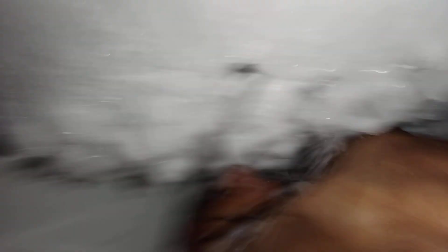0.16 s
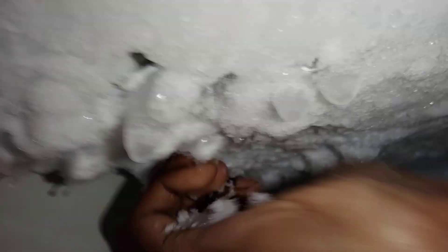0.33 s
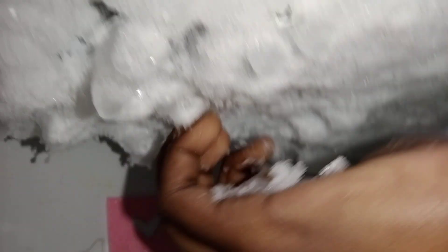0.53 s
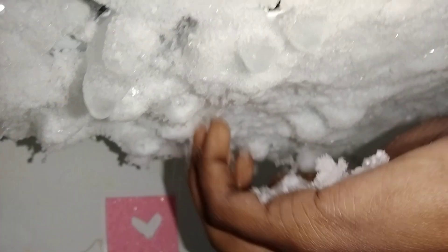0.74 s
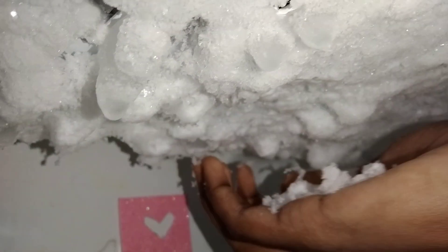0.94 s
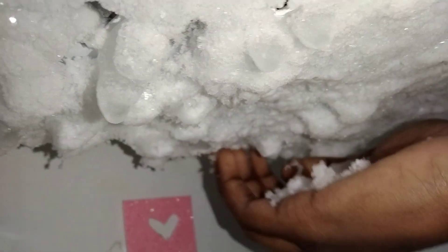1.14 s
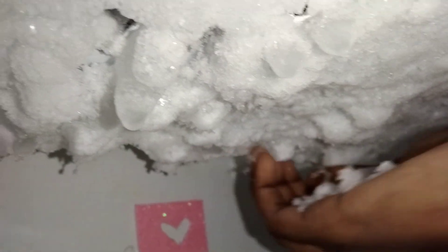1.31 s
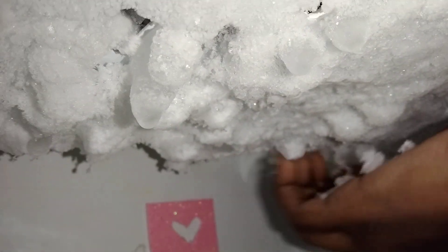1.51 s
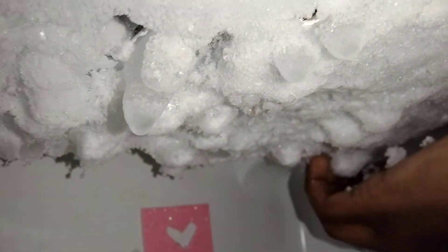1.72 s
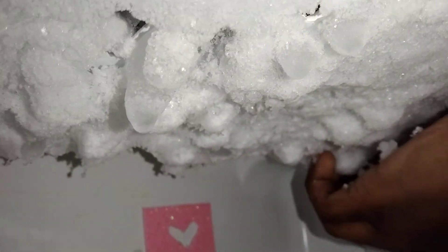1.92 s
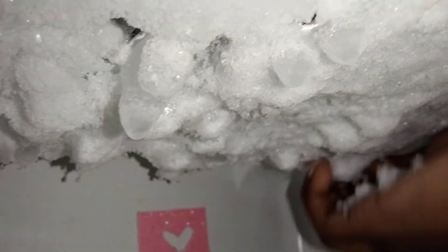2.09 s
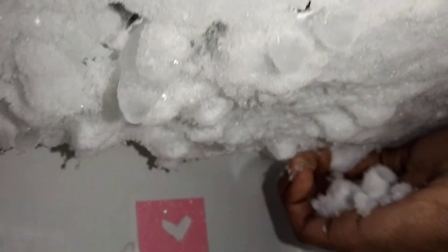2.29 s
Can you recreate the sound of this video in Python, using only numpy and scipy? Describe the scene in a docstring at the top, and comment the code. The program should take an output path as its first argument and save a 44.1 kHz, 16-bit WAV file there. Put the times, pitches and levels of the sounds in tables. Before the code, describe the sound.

Frost cracks under a hand inside a freezer, close up. A small crack and grainy rustle lead to a loud snap at 0.25 seconds, and crumbs rumble against the plastic liner until 0.6. Quieter scraping and dull knocks follow. From 1.6 seconds the crackling thickens, reaching a sharp crack and knock at about 2.1. The compressor hums and whirrs low throughout.

```python
"""A small crack and a grainy rustle, then a loud snap: a hand breaks frost in a freezer, close up. The lump
rings briefly as it snaps off; its crumbs shake the plastic liner, which rumbles and booms. Cracks, dull knocks
and scraping follow the fingers, and a second break rings near the end. Cracks and scraping are runs of tiny
fractures, bright through the air, dull through the liner. The compressor hums and whirrs underneath."""
import sys
import numpy as np
from scipy import signal
from scipy.fft import rfft, irfft, next_fast_len
from scipy.io import wavfile
from scipy.ndimage import uniform_filter1d, map_coordinates

SR = 44100
rng = np.random.default_rng(int(sys.argv[2]) if len(sys.argv) > 2 else 0)


def log_audio(samples):
    """Write samples as a 16-bit WAV file to the path given in sys.argv[1]."""
    # one column per channel
    frames = np.atleast_2d(samples).T
    # limit to full scale, then quantise
    limited = np.clip(frames, -1, 1)
    pcm = np.round(limited * 32767).astype(np.int16)
    wavfile.write(sys.argv[1], SR, pcm)


N = 103635

# compressor shaft harmonics: multiple, level/dB
HUM_HARMONICS = [(1, -64.5), (2, -48), (3, -44.5), (4, -61.5), (5, -64), (6, -62), (9, -65.5)]
# swell of the hum: t/s, gain/dB
HUM_ENVELOPE = [(0, -2.5), (.6, -1.5), (.9, 0.5), (1.7, -2), (1.95, -3), (2.2, 1.5), (2.35, 0.5)]
# compressor whirr: f/Hz, gain/dB
WHIRR_SPECTRUM = [(12, -31), (30, -12), (75, -15.5), (125, -3), (175, -14.5), (215, -3), (334, -20),
                  (500, -10.5), (808, -19), (1050, -29.5), (2050, -45), (3000, -66.5), (4000, -79),
                  (13200, -120)]
# crushed frost: f/Hz, gain/dB
FROST_SPECTRUM = [(710, -53), (1200, -1), (1620, -13), (2240, -2.5), (4330, -17.5), (6180, -13), (7510, -8),
                  (10500, -17.5), (13300, -15.5), (15000, -14), (15800, -5.5)]
# liner and cavity resonances: f/Hz, width/Hz, gain/dB
LINER_MODES = [(302, 136, 4.5), (513, 182, 5.5), (808, 65, 7), (955, 69, 2), (1390, 170, 5),
               (1836, 236, -1), (2346, 300, -9), (2807, 72, -3.5)]
# frost rustle through the air: t/s, level/dB
RUSTLE_ENVELOPE = [(0, -55), (.1, -58.5), (.2, -62.5), (.24, -56), (.3, -47.5), (.39, -48), (.45, -55.5),
                   (.55, -57.5), (.65, -66.5), (.79, -74), (.84, -58), (.95, -72), (1.02, -85),
                   (1.18, -83.5), (1.21, -62.5), (1.35, -62.5), (1.42, -54.5), (1.46, -62), (1.6, -68.5),
                   (1.63, -53.5), (1.73, -54.5), (1.81, -52), (1.93, -51.5), (2.02, -57.5), (2.12, -43.5),
                   (2.19, -57), (2.27, -55.5), (2.35, -56)]
# scrape through the liner: t/s, level/dB
SCRAPE_ENVELOPE = [(0, -55), (.2, -57), (.27, -48), (.4, -43.5), (.5, -54), (.6, -60.5), (.7, -56.5),
                   (.78, -61.5), (.84, -55.5), (.95, -57), (1.05, -59.5), (1.17, -61.5), (1.23, -45),
                   (1.27, -57.5), (1.4, -46), (1.435, -44.5), (1.45, -55), (1.6, -51.5), (1.76, -49.5),
                   (1.92, -49), (2, -61), (2.11, -45.5), (2.16, -43.5), (2.185, -56), (2.35, -51.5)]
# panel resonances: f/Hz, width/Hz, gain/dB
PANEL_MODES = [(119, 20, 3), (200.7, 17, 7.5), (292, 40, -4), (351, 44, -4), (562, 60, -9.5),
               (980, 280, -14.5)]
# panel shaken by crumbs: t/s, level/dB
RUMBLE_ENVELOPE = [(0.25, -22), (0.27, -25.5), (0.296, -30), (0.316, -29.5), (0.404, -32.5), (0.614, -49),
                   (0.664, -62), (0.682, -86), (0.706, -53), (0.8, -83)]
# lowest panel mode: t/s, level/dB
BOOM_ENVELOPE = [(.24, -72), (.26, -35), (.3, -53), (.36, -35), (.4, -33.5), (.43, -38), (.46, -56),
                 (.55, -58), (.6, -76)]
# finger and crumb knocks, and at 2.0965 s the ringing body of a second break: t/s, level/dB, f/Hz, t60/ms
KNOCK_EVENTS = [(0.264, -25, 204, 40), (0.308, -33.5, 760, 60), (0.421, -48, 910, 61),
                (0.668, -41, 670, 40), (0.709, -47.5, 805, 42), (0.834, -45, 586, 140),
                (0.948, -41.5, 537, 63), (0.959, -41.5, 580, 24), (1.097, -41, 640, 38),
                (1.109, -41, 750, 63), (1.194, -41.5, 960, 50), (1.204, -38, 246, 110),
                (1.21, -39, 594, 114), (1.219, -37.5, 462, 120), (1.231, -41.5, 1506, 76),
                (1.296, -53, 464, 96), (1.335, -50.5, 1534, 120), (1.383, -42, 802, 89),
                (1.505, -50, 1530, 54), (1.58, -39, 1516, 46), (1.583, -44.5, 814, 150),
                (1.699, -44, 1497, 52), (1.796, -40, 1438, 110), (1.858, -46.5, 1815, 60),
                (1.882, -45, 1780, 44), (2.0505, -35.5, 1414, 48), (2.0965, -30, 198, 72),
                (2.0965, -27.5, 805, 35), (2.0965, -31.5, 458, 35), (2.0995, -40, 719, 68)]
# small cracks: t/s, air level/dB, top-treble gain/dB, liner level/dB, length/ms
CRACK_EVENTS = [(0.02, -35, -1.5, -52, 7), (0.092, -47.5, -3, -43, 4), (0.1111, -57.5, 17, -66, 5.3),
                (0.2233, -42.5, 13, -47, 7.3), (0.234, -46, 18, -72, 4.4), (0.274, -32.5, -1, -31, 12),
                (0.281, -38, -2, -42, 5.7), (0.306, -41.5, -4, -32.5, 18), (0.353, -41.5, 8, -32, 7.5),
                (0.365, -34, -18, -35.5, 9.8), (0.4005, -46.5, 1, -47, 16), (0.416, -41.5, -4, -38, 18.5),
                (0.459, -39.5, 2, -43.5, 9.9), (0.48, -41.5, 0, -44.5, 13), (0.524, -42.5, 0, -75, 6.3),
                (0.8108, -61.5, -6, -53, 12), (0.825, -51, -6, -47.5, 22), (0.861, -57, -14, -73, 8.9),
                (0.8798, -59.5, -7, -49.5, 14), (1.0456, -62.5, 4.5, -53, 24.4),
                (1.2335, -55.5, 5, -40.5, 9.4), (1.2822, -68, 10, -49.5, 28), (1.4067, -59, 7, -46.5, 20),
                (1.5097, -59, 3, -44.5, 14.4), (1.6278, -45, 6, -51, 12), (1.6686, -51, -4, -61, 6.3),
                (1.7858, -51, -7, -48.5, 7), (1.8, -47.5, -10, -41.5, 7), (1.822, -48, -2, -47, 7.5),
                (1.844, -37.5, -10, -47, 4), (1.861, -45, -3, -58, 6.1), (1.8808, -44.5, 2, -57, 10),
                (1.911, -55.5, 14, -49, 9.4), (1.9802, -39.5, -6, -49.5, 10.3),
                (2.0249, -52, -7, -43.5, 5.9), (2.05, -37.5, -1, -41, 12.3), (2.069, -46, -4, -42, 11),
                (2.0856, -44, -6, -32, 7), (2.0957, -27, -1.5, -29, 6.2), (2.11, -44, -6, -39, 10),
                (2.123, -39.5, -5, -35, 11), (2.136, -54, -10, -46, 6.2), (2.147, -42, -10, -55, 4.4),
                (2.161, -46, -12, -41, 4.4), (2.217, -50, 0, -41, 9.1), (2.292, -39, 5, -40.5, 7.5),
                (2.311, -45, 6, -63, 6.8)]
# modes of the snapping lump: f/Hz, gain/dB, t60/s
LUMP_MODES = [(191, -8, 0.11), (435, 2.5, 0.023), (635, 0, 0.041), (1070, -6.5, 0.024), (1182, 9, 0.017),
              (1362, 5.5, 0.023), (1830, 4, 0.018), (2030, -0.5, 0.016)]

SHAFT_HZ, HUM_WAVER_DB, WHIRR_DB = 49.53, 1.94, -54.5
GRAINS_PER_S, GRAIN_SPREAD_DB = 2800, 8
SPLINTERS_PER_S, SPLINTER_HZ, SPLINTER_T60_CYCLES = 260, 4500, 24
KNOCK_RISE_S, KNOCK_ROUGHNESS, KNOCK_WANDER_RAD = 0.0012, 0.3, 0.75
CRACK_RISE_S, CRACK_FALL_POWER = 0.0006, 1.83
AIR_CLICK_DB, LINER_CLICK_DB = -0.5, 15  # first fracture, relative to the run
SNAP_S, SNAP_RING_DB = 0.2468, -14
BURST_DB, BURST_TOP_DB, BURST_T60_S = -10, -9.5, 0.031


def amp(db):
    """Decibels to gain."""
    return 10 ** (np.asarray(db) / 20)


def unit(x):
    """Scale to rms 1."""
    return x / np.sqrt(np.mean(x ** 2) + 1e-20)


def envelope(rows, outside_db=None):
    """Gain per sample from rows of t/s, level/dB."""
    times_s, db = np.transpose(rows)
    return amp(np.interp(np.arange(N) / SR, times_s, db, outside_db, outside_db))


def wobble(rate_hz):
    """Smooth random curve, rate_hz knots a second."""
    knots = rng.standard_normal(int(N * rate_hz / SR) + 4)
    return map_coordinates(knots, [np.arange(N) * rate_hz / SR])


def tremor(samples):
    """Short smooth random curve starting at zero."""
    curve = unit(signal.fftconvolve(rng.standard_normal(samples), np.hanning(SR // 260), "same"))
    return curve - curve[0]


def filtered(x, response):
    """Apply a complex frequency response."""
    size = next_fast_len(N + SR // 2)
    return irfft(rfft(x, size) * response(np.fft.rfftfreq(size, 1 / SR)), size)[..., :N]


def colour(spectrum):
    """Response from rows of f/Hz, gain/dB, on a log axis."""
    knots_hz, db = np.transpose(spectrum)
    return lambda hz: amp(np.interp(np.log(hz + 1), np.log(knots_hz + 1), db))


def resonant(modes):
    """Response of parallel resonators of alternating sign."""
    return lambda hz: sum((-1) ** k * amp(db) * 1j * hz * width / (f0 * f0 - hz * hz + 1j * hz * width)
                          for k, (f0, width, db) in enumerate(modes))


def top_treble(x, corner_hz=8600):
    """The part of x above the corner."""
    return filtered(x, lambda hz: 1 / (1 + (corner_hz / (hz + 1)) ** 8))


def patchy(x, depth_db):
    """Random patches of gain over time and frequency."""
    spectra = signal.stft(x, nperseg=256)[2]
    patches = uniform_filter1d(rng.standard_normal(spectra.shape), size=5, axis=0)
    patches = unit(uniform_filter1d(patches, size=7, axis=1))
    return unit(signal.istft(spectra * amp(depth_db * patches), nperseg=256)[1][:N])


def compressor():
    """Shaft harmonics wavering in level, over a dull whirr."""
    t = np.arange(N) / SR
    hum = np.zeros(N)
    for multiple, db in HUM_HARMONICS:
        gain = np.sqrt(2) * amp(db + HUM_WAVER_DB * wobble(2.6))
        hum += gain * np.sin(2 * np.pi * (multiple * SHAFT_HZ * t + rng.random()))
    whirr = unit(filtered(rng.standard_normal(N), colour(WHIRR_SPECTRUM)))
    return envelope(HUM_ENVELOPE) * hum + amp(WHIRR_DB + 0.19 * wobble(40)) * whirr


def liner(hz, cutoff_hz=2900):
    """Plastic liner response: resonances under a steep low-pass."""
    return resonant(LINER_MODES)(hz) / (1 + (hz / cutoff_hz) ** 8) ** .5


def grit(noise_ratio):
    """Dense tiny fractures of uneven size, plus smooth noise."""
    hits = rng.random(N) < GRAINS_PER_S / SR
    grains = hits * rng.choice([-1, 1], N) * amp(GRAIN_SPREAD_DB * rng.standard_normal(N))
    return unit(unit(grains) + noise_ratio * rng.standard_normal(N))


def splinters(per_s):
    """Ice splinters: tiny glassy rings of random pitch and size."""
    count, t = int(per_s * N / SR), np.arange(SR // 60) / SR
    starts = rng.integers(0, N, (count, 1))
    pitch, size = rng.standard_normal((count, 2)).T[..., None]
    hz = np.clip(SPLINTER_HZ * np.exp(.25 * pitch), 2000, 14000)
    shapes = amp(1.8 * size - 60 * hz * t / SPLINTER_T60_CYCLES) * (1 - np.exp(-hz * t / 2))
    rings = shapes * np.sin(2 * np.pi * hz * t)
    positions = starts + np.arange(len(t))
    return unit(np.bincount(positions.ravel(), rings.ravel(), N + SR)[:N])


def fingers(splinter_db=-10):
    """Fingers rub frost: a lumpy rustle with splinters, and a scrape through the liner."""
    lumps = wobble(43.86)
    flutter = amp(1.6 * lumps + 2.2 * wobble(190))
    frost = patchy(filtered(grit(noise_ratio=2.4), colour(FROST_SPECTRUM)), depth_db=1.5)
    friction = amp(0.87 * lumps + .8 * wobble(24.97)) * grit(noise_ratio=1.8)
    scrape = patchy(filtered(friction, liner), depth_db=1.35)
    rustle = unit(unit(flutter * frost) + amp(splinter_db) * splinters(SPLINTERS_PER_S))
    return envelope(RUSTLE_ENVELOPE) * rustle + envelope(SCRAPE_ENVELOPE) * scrape


def knocks():
    """Fingers and crumbs knock, and a second break rings: soft-edged, slightly rough damped tones."""
    out, t = np.zeros(N + SR), np.arange(SR // 6) / SR
    for start_s, db, hz, t60_ms in KNOCK_EVENTS:
        rough = 1 + KNOCK_ROUGHNESS * tremor(len(t))
        tone = np.sin(2 * np.pi * hz * t + KNOCK_WANDER_RAD * tremor(len(t)))
        shape = amp(-60 * t / (t60_ms / 1000)) * (1 - np.exp(-t / KNOCK_RISE_S))
        out[round(start_s * SR):][:len(t)] += amp(db) * shape / shape.max() * rough * tone
    return out[:N]


def levelled(shape, noise):
    """Rescale shape so that shape * noise has the energy of the bare shape."""
    return shape * np.linalg.norm(shape) / np.linalg.norm(shape * noise)


def cracks(splinter_db=-8):
    """Each crack is a click and a dying run of fractures; part of it drives the liner."""
    air, drive, t = np.zeros(N + SR), np.zeros(N + SR), np.arange(SR // 20) / SR
    frost = patchy(filtered(grit(noise_ratio=1.6), colour(FROST_SPECTRUM)), depth_db=2.8)
    frost += amp(splinter_db) * splinters(2 * SPLINTERS_PER_S)
    white = grit(noise_ratio=2.2)
    frost, top, white = (np.pad(x, (0, SR), "wrap") for x in (frost, top_treble(frost), white))
    for start_s, air_db, top_db, liner_db, length_ms in CRACK_EVENTS:
        start = round(start_s * SR)
        span = slice(start, start + len(t))
        shape = np.exp(-(1000 * t / length_ms) ** CRACK_FALL_POWER) * (1 - np.exp(-t / CRACK_RISE_S))
        fractures = frost[span] + (amp(top_db) - 1) * top[span]
        air[start:start + 4] += amp(air_db + AIR_CLICK_DB) * np.array([1, 1, -1, -1])
        air[span] += amp(air_db) * levelled(shape, frost[span]) * fractures
        drive[start] += amp(liner_db + LINER_CLICK_DB)
        drive[span] += amp(liner_db) * levelled(shape, white[span]) * white[span]
    return air[:N] + filtered(drive[:N], liner) / np.std(filtered(white[:N], liner))


def panel(boom_hz=126.2, waver_db=2.5):
    """Falling crumbs shake the panel: it rumbles and its lowest mode booms."""
    crumbs = amp(.6 * wobble(40)) * rng.standard_normal(N)
    rumble = envelope(RUMBLE_ENVELOPE, outside_db=-120) * unit(filtered(crumbs, resonant(PANEL_MODES)))
    boom_gain = np.sqrt(2) * envelope(BOOM_ENVELOPE, outside_db=-120) * amp(-waver_db * wobble(30))
    phase_rad = 2 * np.pi * boom_hz * np.arange(N) / SR + 0.23 * wobble(25)
    return rumble + boom_gain * np.sin(phase_rad)


def snap():
    """The lump breaks off and rings briefly under a short burst of frost noise."""
    ring, burst_gain, t = np.zeros(N), np.zeros(N), np.arange(SR // 4) / SR
    start = round(SNAP_S * SR)
    span = slice(start, start + len(t))
    modes = sum(amp(db - 60 * t / t60_s) * np.sin(2 * np.pi * hz * t) for hz, db, t60_s in LUMP_MODES)
    ring[span] = amp(SNAP_RING_DB) * modes * (1 - np.exp(-t / 0.00084))
    burst_gain[span] = amp(BURST_DB - 60 * t / BURST_T60_S) * (1 - np.exp(-t / 0.00086))
    frost = unit(filtered(rng.standard_normal(N), colour(FROST_SPECTRUM)))
    return ring + burst_gain * (frost + (amp(BURST_TOP_DB) - 1) * top_treble(frost))


def scene():
    """All sources, mono."""
    return (compressor() + snap() + panel() + cracks() + knocks() + fingers())[None]


def record(dry):
    """Phone microphone: bass roll-off and a hard band limit."""
    bass_hz, limit_hz, taper_hz = 85, 15900, 500
    highpass = lambda hz: (1j * hz / (bass_hz + 1j * hz)) ** 2
    lowpass = lambda hz: np.clip((limit_hz - hz) / taper_hz, 0, 1) ** 2
    return filtered(dry, lambda hz: highpass(hz) * lowpass(hz))


dry = scene()
out = record(dry)
log_audio(out)
```